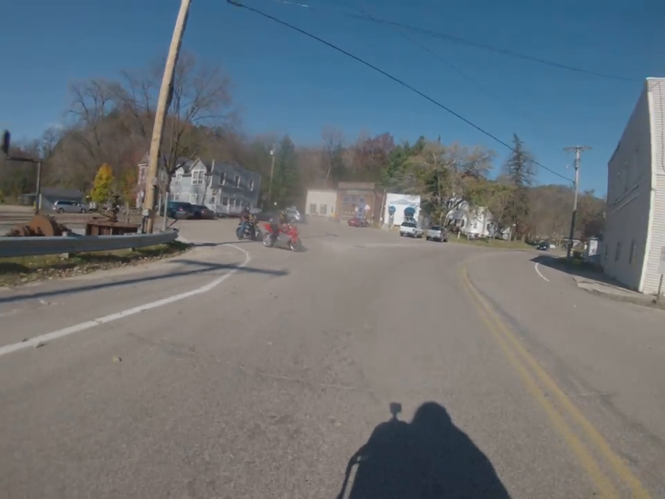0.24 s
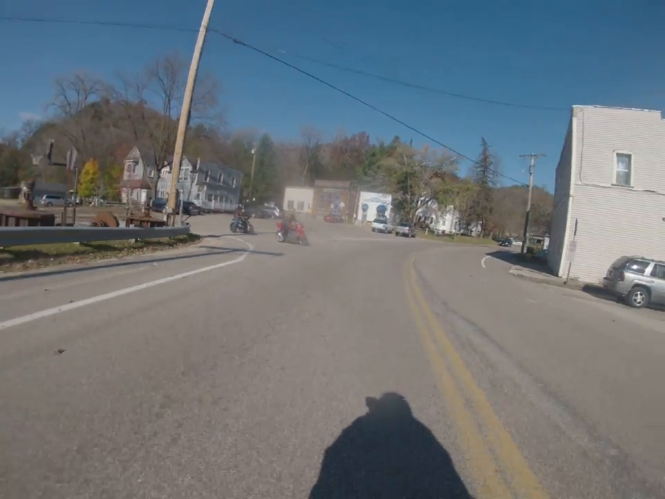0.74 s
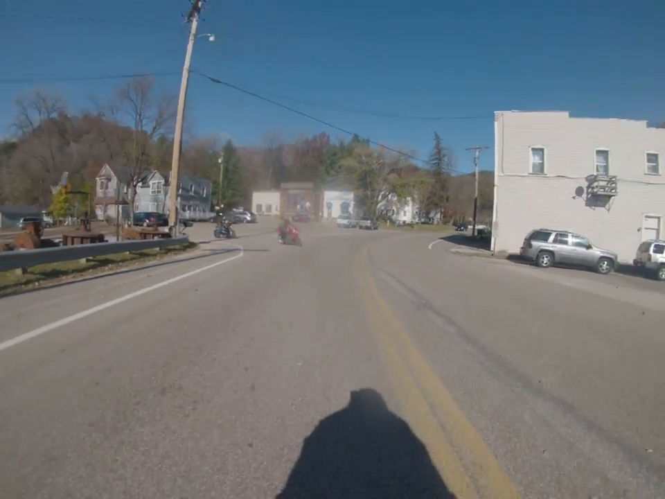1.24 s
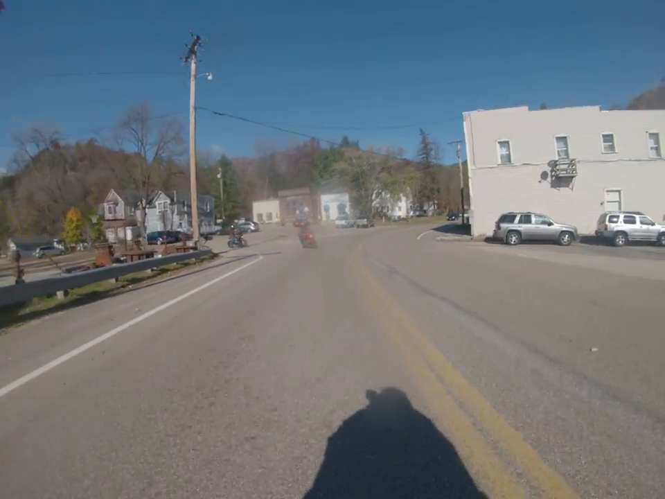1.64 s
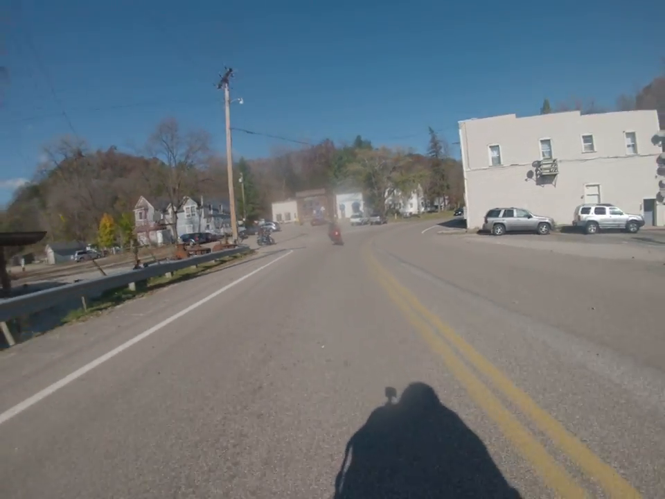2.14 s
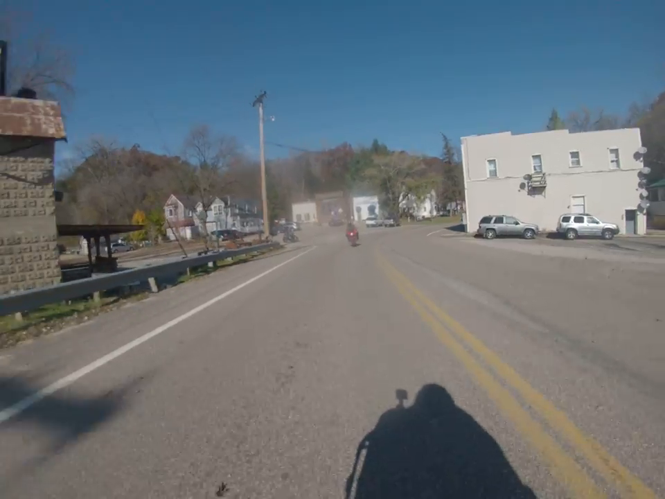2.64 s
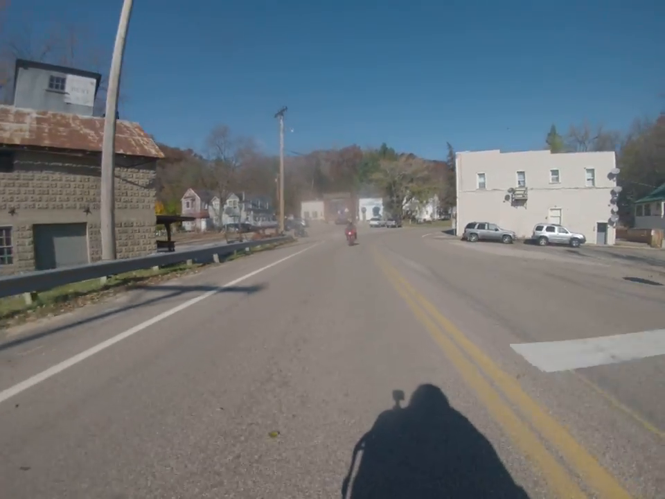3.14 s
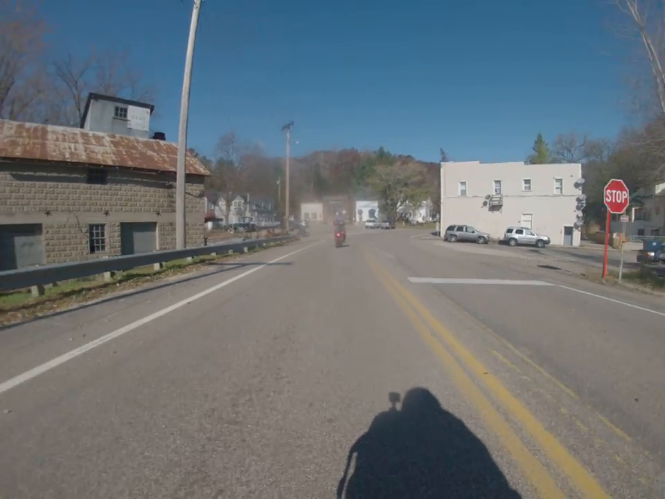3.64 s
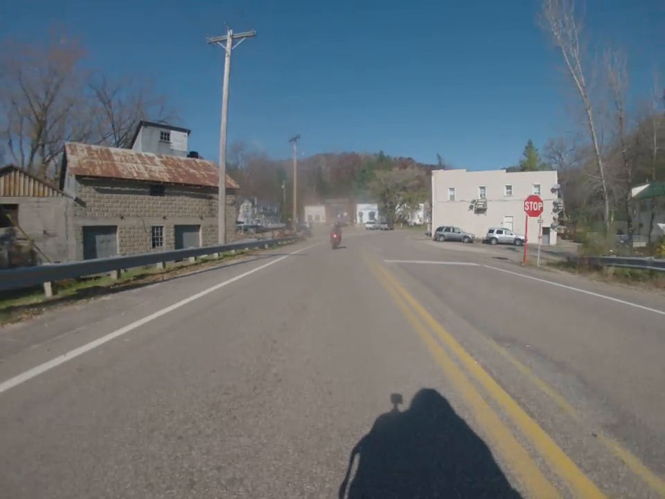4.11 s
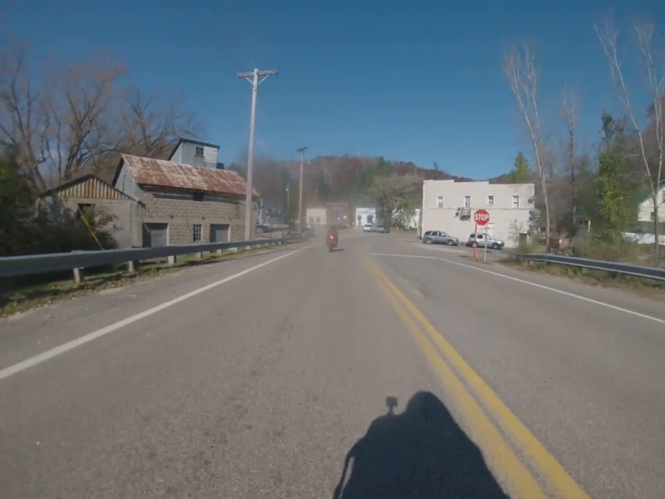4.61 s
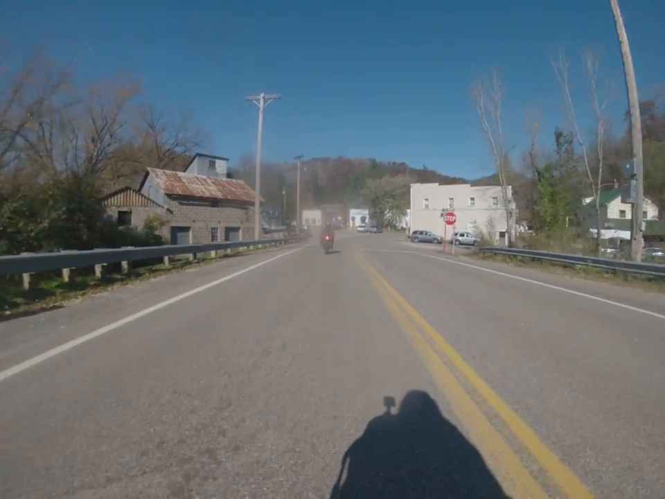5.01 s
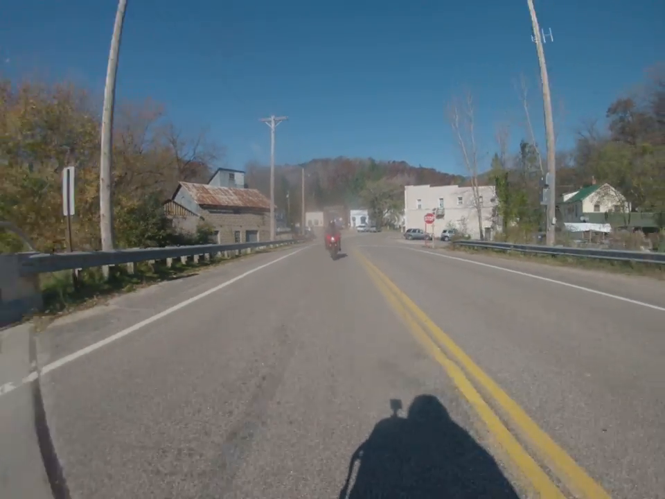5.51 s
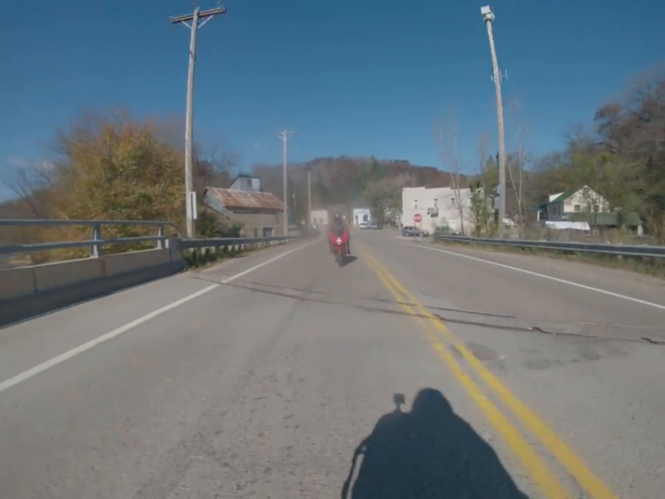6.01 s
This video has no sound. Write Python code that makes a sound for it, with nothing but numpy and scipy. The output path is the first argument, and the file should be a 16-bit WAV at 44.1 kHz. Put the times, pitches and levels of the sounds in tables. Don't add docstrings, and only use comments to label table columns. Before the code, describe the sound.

Heard from a boxed microphone fixed to a motorcycle's tail, a deep engine drone beats and climbs steadily in pitch. Coarse asphalt rumbles below, with dull bumps. Chain whine and gear hiss ride above, with fine valve ticks and a faint metallic ping. Later a loose mount clicks. Near the end a rail crossing gives a heavy low jolt, a housing rattle and a dull thunk, and the ride goes on.

```python
import sys
import numpy as np
from scipy import signal
from scipy.fft import rfft, irfft, next_fast_len
from scipy.io import wavfile
from scipy.ndimage import uniform_filter1d

SR = 44100
rng = np.random.default_rng(int(sys.argv[2]) if len(sys.argv) > 2 else 0)


def generate_wav(sig):
    pcm = np.round(np.clip(np.atleast_2d(sig).T, -1, 1) * 32767).astype(np.int16)
    wavfile.write(sys.argv[1], SR, pcm)


def field_ratio(decibels):
    return 10 ** (np.asarray(decibels, dtype=float) / 20)


N = 276066


def level(x, db):
    return x * field_ratio(db) / np.sqrt(np.mean(x ** 2))


def curve(table):
    s, *columns = np.transpose(table)
    return [np.interp(np.arange(N) / SR, s, c) for c in columns]


def colour(x, points):
    size = next_fast_len(N + SR)
    hz, db = np.transpose(points)
    bins_hz = np.arange(size // 2 + 1) * SR / size
    gain = field_ratio(np.interp(np.log(bins_hz + 1), np.log(hz), db))
    return irfft(rfft(x, size) * gain, size)[:N]


def band(x, hz, width):
    return signal.lfilter(*signal.iirpeak(hz, hz / width, SR), x)


def steep(x, hz, width):
    return band(band(x, hz, width), hz, width)


def walk(rate):
    held = np.repeat(rng.standard_normal(int(N / SR * rate) + 2), 16)
    slewed = uniform_filter1d(uniform_filter1d(held, size=16), size=16)
    return 1.3 * np.interp(np.arange(N) * 16 * rate / SR, np.arange(len(held)), slewed)


def lifts(x, table):
    at = np.linspace(x.min(), x.max(), num=600)
    db_at = sum(db * np.exp(-(2 * (at - centre) / width) ** 2) for centre, width, db in table)
    return np.interp(x, at, db_at)


def grown(hz, db, per_octave_db):
    return db + per_octave_db * np.log2(hz / 44)


def past(x, edge, soft):
    return .5 + .5 * np.tanh((x - edge) / soft)


def burst(since, decay):
    return since / decay * np.exp(1 - since / decay)


def add_at(out, s, sound):
    i = int(s * SR)
    out[i:i + len(sound)] += sound


def puffs(turns, every, at, decay, scatter_db, jitter):
    place = (turns - at) / every + 1
    chance = rng.standard_normal((int(place[-1]) + 2, 2))
    k = place.astype(int)
    late = jitter * (2 + np.clip(chance[k, 0], -2, 2))
    since = np.maximum((place - k) * every - late, 0)
    return field_ratio(scatter_db * chance[k, 1]) * burst(since, decay)


def road(hz):
    # Hz, level in dB per Hz.
    asphalt = [(8.8, -35.5), (15, -12), (43, -4), (71, -7), (100, -17), (145, -20), (250, -21), (284, -22),
               (318, -31), (380, -30), (453, -25), (491, -30), (559, -45), (910, -61.5), (1540, -120)]
    # centre in seconds, length in seconds, extra level in dB.
    rough = [
        (1.203, 0.32, -2),
        (2.747, 0.54, 3.5),
        (3.898, 0.76, -1),
        (5.202, 0.35, -4.5),
        (5.675, 0.47, 2),
    ]
    # start in seconds, peak in dB, ring in Hz.
    bumps = [(0.048, -14, 71), (0.223, -16, 54), (0.371, -17, 33.7), (0.661, -35, 53), (0.76, -22.5, 72),
             (0.887, -18.5, 73.3), (1.287, -18, 65), (1.467, -15, 62), (1.618, -17, 65), (1.858, -16.5, 65),
             (2.134, -12.5, 67.6), (2.22, -24.5, 105), (2.333, -8, 63.2), (2.978, -14.5, 40.6),
             (5.59, -7, 64.5), (5.63, -23, 206.4), (5.656, 0.5, 44), (5.721, -11.5, 62.5)]
    rumble_db = grown(hz, -32.5, 7.5) + lifts(np.arange(N) / SR, rough)
    rumble = level(colour(rng.standard_normal(N), asphalt), 0)
    out = field_ratio(rumble_db + 0.094 * walk(12.0)) * rumble
    t = np.arange(int(.3 * SR)) / SR
    swell = (t / 0.043 * np.exp(1 - t / 0.027)) ** 2
    for s, db, ring_hz in bumps:
        add_at(out, s, field_ratio(db + 1.5) * swell * np.sin(2 * np.pi * ring_hz * t))
    return out


def thunk():
    t = np.maximum(np.arange(N) / SR - 5.711, 0)
    return field_ratio(-32) * burst(t, .0016) * np.sin(2 * np.pi * 900 * t)


def rattles():
    # start in seconds, peak in dB, treble share in dB.
    knocks = [(5.496, -54, -7), (5.554, -41, -26), (5.561, -58, -2), (5.608, -43, -14), (5.6531, -43, -34),
              (5.6648, -37, -30), (5.6875, -28, -32), (5.687, -52, -17), (5.6978, -28, -35),
              (5.7, -55, -24), (5.7138, -55, -31), (5.7313, -56, -14), (5.7508, -54, -10),
              (5.7797, -54, -20.5), (5.7877, -44, -27.5), (6.069, -51, -3), (6.1167, -47, -8),
              (6.1777, -47, -7), (6.231, -45, -14)]
    out = np.zeros(N + SR)
    t = np.arange(int(0.071 * SR)) / SR
    for s, db, treble_db in knocks:
        crack = rng.standard_normal(len(t)) * np.exp(-t / .0022)
        body = band(crack, 1600, 1200) + 0.21 * steep(crack, 3800, 2000)
        treble = field_ratio(treble_db) * steep(crack, 9000, 9000)
        add_at(out, s, field_ratio(db - 0.5) * (body + treble))
    return out[:N]


def clicks():
    # start in seconds, peak in dB, share of the lower resonance in dB.
    snaps = [(2.1973, -63, 0), (2.318, -56, -9), (2.3669, -56, -1), (2.4183, -64, -11), (2.4911, -59, -10),
             (2.5156, -59, -1), (2.5393, -56, -1), (2.5615, -64, -7), (2.6347, -55.5, -1), (2.7281, -54, 0),
             (2.7505, -61, -1), (2.8683, -54, -6), (2.914, -60, 3), (2.9601, -64, -2), (3.006, -58, -1),
             (3.0967, -64, -6), (3.1411, -57.5, -6), (3.32, -59, 1), (3.4519, -60, -4), (3.5392, -60, -8),
             (3.6679, -57.5, -8), (3.7533, -55, -14), (3.8465, -64, -6), (3.8465, -57, -12),
             (3.9209, -62, -8), (3.9628, -57, -10), (4.0541, -49, -11), (4.096, -55, -4), (4.1284, -55, -7),
             (4.1778, -74, 5), (4.1778, -54, -7), (4.2203, -56, -6), (4.2606, -56, -6), (4.341, -52, -4),
             (4.3713, -53, -9), (4.5405, -71, -2), (4.5405, -57, -11), (4.61, -57, -9), (4.728, -60, -12),
             (4.766, -59, -14), (4.9211, -58, -16), (4.9585, -62, -8), (5.1257, -55, -4), (5.3481, -60, -5),
             (5.412, -58, -4), (5.4968, -56, -4), (5.5247, -59.5, 1), (5.607, -71, -4), (5.607, -52, -17),
             (5.6539, -66, 0), (5.6869, -67, 0), (5.7273, -57, -11), (5.7512, -55, -8), (5.8535, -63, -7),
             (5.9069, -53.5, -15), (5.923, -57, -9.5), (6.0685, -62, -12), (6.086, -54, -3),
             (6.1049, -65, -13), (6.1778, -56, -8)]
    out = np.zeros(N)
    t = np.arange(int(.012 * SR)) / SR
    for s, db, lower_db in snaps:
        crack = burst(t, .0005) * rng.standard_normal(len(t))
        lower = field_ratio(lower_db + 6) * steep(crack, 6900, 2200)
        add_at(out, s, field_ratio(db + 4) * (steep(crack, 10700, 2300) + lower))
    return out


def pings():
    # start in seconds, peak in dB, pitch in Hz.
    strikes = [(0.5793, -66, 4850), (0.6366, -62, 4700), (0.693, -59, 4640), (0.7505, -61, 4660),
               (0.8092, -59, 4640), (0.8661, -63, 4730), (0.923, -60, 4840), (0.9764, -63, 4900),
               (1.0352, -59, 4800), (1.0881, -58, 4700), (1.1465, -56, 4800), (1.2014, -53.5, 4820),
               (1.2542, -56, 4730), (1.3095, -54.5, 4780), (1.365, -61, 4860), (1.4149, -58, 4720),
               (1.472, -52, 4810), (1.5256, -54, 4840), (1.5785, -60, 4830), (1.6289, -58, 4840),
               (1.6838, -54.5, 4860), (1.7361, -73, 4690), (1.785, -65, 4820), (1.8404, -59, 4920),
               (1.8918, -56, 4850), (1.9402, -56, 4770), (1.9906, -60, 5010), (2.0953, -58, 4830),
               (2.1457, -61, 4600), (2.1951, -56, 4900), (2.2445, -52.5, 4800), (2.2949, -58, 5020),
               (2.3398, -67, 4580), (2.3892, -52, 4820), (2.4375, -63, 4860), (2.4889, -54, 4830),
               (2.5373, -53, 4990), (2.5847, -60, 4820), (2.6321, -56, 4820), (2.68, -56, 4820),
               (2.7274, -58, 4880), (2.7718, -65, 5110), (2.8207, -56, 4830), (2.8671, -63, 4790),
               (2.9379, -68, 4940)]
    out = np.zeros(N)
    t = np.arange(int(.02 * SR)) / SR
    for s, db, hz in strikes:
        rasp = .6 * band(rng.standard_normal(len(t)), 4900, 1400)
        add_at(out, s, field_ratio(db - 3.0) * burst(t, 0.0018) * (np.cos(2 * np.pi * hz * t) + rasp))
    return out


def valves(turns, hz):
    # centre in Hz, width in Hz, level in dB.
    cover = [(3200, 350, 4.5), (4310, 890, -2), (5040, 780, 0), (6470, 820, -4.5), (7330, 1150, -1),
             (9200, 3600, -12), (11140, 670, -9), (12400, 1300, -18)]
    # crank Hz, width in Hz, lift in dB.
    buzz = [(41, 1.5, 5), (49.5, 2, 0)]
    shared = puffs(turns, 1, .38, .035, 2.5, .03)
    ticks = 0
    for centre_hz, width, db in cover:
        own = .8 * puffs(turns, 1, .25, .08, 3.0, .035)
        gate = .4 * shared + own + .42 * field_ratio(2.5 * walk(90))
        ticks = ticks + field_ratio(db) * steep(gate * rng.standard_normal(N), centre_hz, width)

    struck = .3 * puffs(turns, 2, .3, .07, 3.0, .03)
    pitch_hz = 4800 + 70 * walk(51)
    tone = np.cos(2 * np.pi * np.cumsum(pitch_hz) / SR) + .5 * rng.standard_normal(N)
    ping = steep(struck * tone, 4880, 700)
    pinging = past(hz, 34.6, .7) * (1 - past(hz, 43.3, .3))
    ping_db = -74 - 20 * (1 - pinging)

    knock = (.7 * shared + puffs(turns, 2, 1.74, .025, 3.0, .02) + .25) * rng.standard_normal(N)
    click = steep(knock, 10670, 2600) + .5 * steep(knock, 4400, 1200) + 1.0 * steep(knock, 4500, 2000)
    loose_db = 6 * past(hz, 40.5, .4)
    click_db = grown(hz, -88, 2.5) + loose_db + lifts(hz, buzz)

    out = field_ratio(grown(hz, -80, 6)) * level(ticks, 7.13)
    return out + field_ratio(ping_db) * level(ping, -8.5) + field_ratio(click_db) * level(click, 0.8)


def clatter(turns, hz):
    # centre in Hz, width in Hz, level in dB.
    housing = [(485.5, 35, -2.5), (678, 530, -6), (802, 180, -4.5), (948, 200, 1), (1120, 500, -10.5),
               (1211, 72, -4.5), (1392, 124, -6.5), (1534, 310, -14.5), (1630, 350, -24),
               (1958, 160, -22.5), (2158, 370, -17), (2600, 820, -24)]
    throb = 1 + 0.34 * np.cos(2 * np.pi * (turns - .6)) + 0.08 * np.cos(np.pi * turns)
    rush = 0
    for centre_hz, width, db in housing:
        noise = steep(throb * rng.standard_normal(N), centre_hz, width)
        rush = rush + field_ratio(db + 0.52 * walk(8.1)) * noise
    return field_ratio(grown(hz, -55.5, 8.5)) * level(rush, 3.86)


def panels():
    # centre in Hz, width in Hz, level in dB.
    plates = [(817, 110, -7.5), (872, 180, -8), (939, 128, -2), (1020, 200, -16), (1177, 210, -13),
              (1402, 140, -8), (1500, 200, -24), (1787, 120, -19.5), (1972, 180, -17), (2210, 340, -19.5),
              (2496, 220, -18), (2970, 500, -41.5)]
    at = np.linspace(500, 4000, num=700)
    power = 0
    for centre, width, db in plates:
        power = power + (field_ratio(db) / (1 + (2 * (at - centre) / width) ** 2) ** 2) ** 2
    return np.transpose([at, 10 * np.log10(power)])


def chain(turns, wheel):
    link_db = (-40.5, -49.5, -49.5, -54.5)
    crank = 2 * np.pi * turns
    ripple = .75 * np.sin(crank + 1.9) + .15 * np.sin(crank / 2) + .4 * np.sin(2 * crank)
    links = 11.66 * turns
    links = links + .1 * np.sin(wheel) + .035 * walk(7) + .02 * walk(22)
    slap = 1 + .3 * np.cos(crank + .4 * walk(6)) + .12 * np.cos(crank / 2) + .22 * walk(45)
    whine = 0
    for k, db in enumerate(link_db):
        angle = 2 * np.pi * (k + 2) * links + ripple / (k + 1)
        whine = whine + field_ratio(db + 1.5 * walk(10)) * np.cos(angle)
    return colour(slap * whine, panels())


def drone(turns, wheel, uneven, multiple, db):
    swell = 1 + uneven / max(multiple, 1.)
    waver = .22 * np.sin(wheel) + .15 * walk(6.7)
    angle = 2 * np.pi * multiple * turns + waver + rng.uniform(0, 2 * np.pi)
    return field_ratio(db + .8 * walk(5)) * swell * np.cos(angle)


def engine(turns, wheel, hz):
    # time in seconds, load in dB.
    load = [(0.0, -7.5), (0.5, -5), (1.0, 1), (1.75, -4), (2.2, -1), (2.5, 1), (2.75, -1), (3.1, 2.5),
            (3.6, 3.5), (4.1, 7.5), (4.3, 3.5), (4.5, -3.5), (4.7, -3), (4.9, 1), (5.4, -1.5), (5.9, -0.5),
            (6.26, -2.5)]
    # multiple of crank speed, level in dB, rise in dB per octave of speed, share of load 0-1.1.
    strong_orders = [(1, -27.5, 30, 0.45), (1.5, -38, 6, 0.91), (2, -33, 8.5, 0.3), (3, -37.5, -11, 1.1),
                     (4, -41.5, 7.5, 0.1), (5, -40, 3.5, 0.55), (6, -39, 3.5, 0.61), (.5, -44.5, 25, 0.2),
                     (2.5, -50, 9, 0.8), (3.5, -51, 8, 0.1), (4.5, -43.5, -5.5, 0.7),
                     (5.5, -50.5, -0.5, 0.2), (7, -46.5, -7, 0.1)]
    # multiple of crank speed, level in dB.
    weak_orders = [(6.5, -52), (7.5, -51), (8.0, -46.5), (8.5, -54.5), (9.0, -57), (9.5, -59),
                   (10.0, -51.5), (10.5, -55.5), (11.0, -58.5), (11.5, -54.5), (12.0, -52), (12.5, -59.5),
                   (13.0, -64), (13.5, -58.5), (14.0, -59.5), (14.5, -59.5), (15, -65.5), (16, -61.5),
                   (17, -72.5), (17.5, -71.5), (18, -64.5), (18.3, -50.5), (19, -68.5), (20, -69.5)]
    # centre in Hz, width in Hz, lift in dB.
    mount = [(34.94, 7.7, 9.5), (42.8, 1.4, -15.5), (44.3, 3.3, 2), (65, 10.4, 11.5), (81, 4.9, -8),
             (91.6, 8.2, -6), (116, 10, 5), (145.9, 7.7, -6), (168.1, 28, 4), (200.3, 1.77, -18.5),
             (226.1, 12, 2.5), (254.6, 15, 5), (300.4, 21.4, 6), (352, 93, -14)]
    # Hz, gain in dB.
    frame = [(33.0, -14), (40.0, -5), (48.0, -7), (56.0, 8), (70.0, 18.5), (90.0, -6), (125.0, -7),
             (170.0, 10.5), (215.0, 7), (285.0, 4), (345.0, -3), (400.0, -14.5), (460.0, 8.5),
             (520.0, -12.5)]
    load_db = curve(load)[0]
    uneven = 0.5 * past(hz, 46, 1.7) * np.cos(wheel)
    weak = sum(drone(turns, wheel, uneven, multiple, db) for multiple, db in weak_orders)
    strong = 0
    for multiple, db, rise_db, share in strong_orders:
        order_db = grown(hz, db, rise_db) + share * load_db + lifts(multiple * hz, mount)
        strong = strong + drone(turns, wheel, uneven, multiple, order_db)
    return strong + colour(field_ratio(0.37 * load_db) * weak, frame)


def scene():
    # time in seconds, crank turns in Hz.
    crank_speed = [(0.0, 32.16), (0.4, 33.89), (0.8, 35.18), (1.2, 36.43), (1.6, 37.9), (2.0, 39.35),
                   (2.4, 41.18), (2.8, 42.8), (3.2, 44.74), (3.6, 46.36), (4.0, 48.11), (4.4, 50.2),
                   (4.8, 51.45), (5.2, 52.95), (5.6, 54.36), (6.0, 55.98), (6.26, 56.64)]
    hz = curve(crank_speed)[0]
    turns = np.cumsum(hz) / SR
    wheel = 2 * np.pi * (turns / 12.15 - .46)
    ride = road(hz) + thunk() + rattles() + clicks() + pings()
    motor = valves(turns, hz) + clatter(turns, hz) + chain(turns, wheel) + engine(turns, wheel, hz)
    return (ride + motor)[None]


def band_limit(x):
    return signal.sosfilt(signal.butter(12, 15690, fs=SR, output="sos"), x)


def record(dry):
    heard = signal.sosfiltfilt(signal.butter(10, 15800, fs=SR, output="sos"), dry)
    body = signal.sosfiltfilt(signal.butter(20, 12900, fs=SR, output="sos"), heard)
    hiss = field_ratio(-85) * steep(rng.standard_normal(N), 14600, 3500) * past(walk(70), 0, .2)
    top = heard - body + hiss
    flicker = .15 + .8 * past(walk(14), -.6, .1)
    return band_limit(body + top * flicker)


dry = scene()
out = record(dry)
generate_wav(out)
```